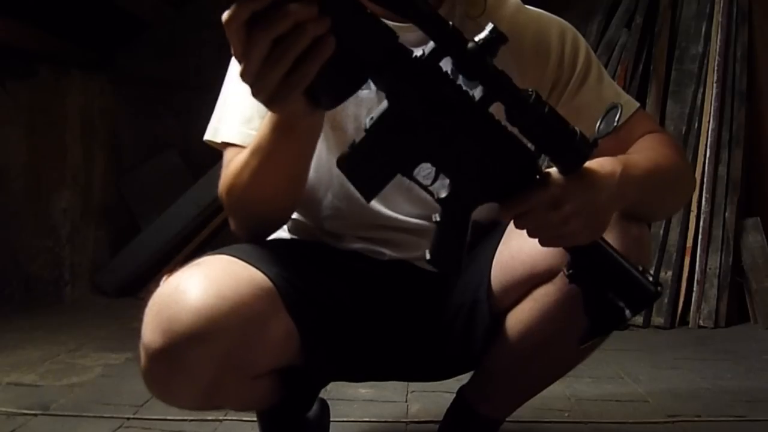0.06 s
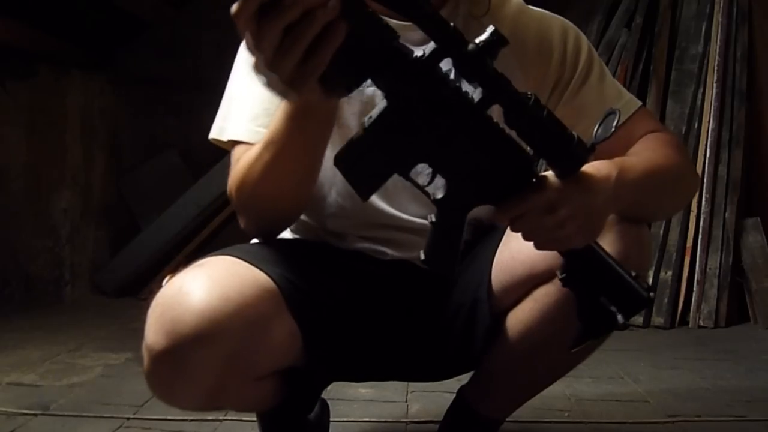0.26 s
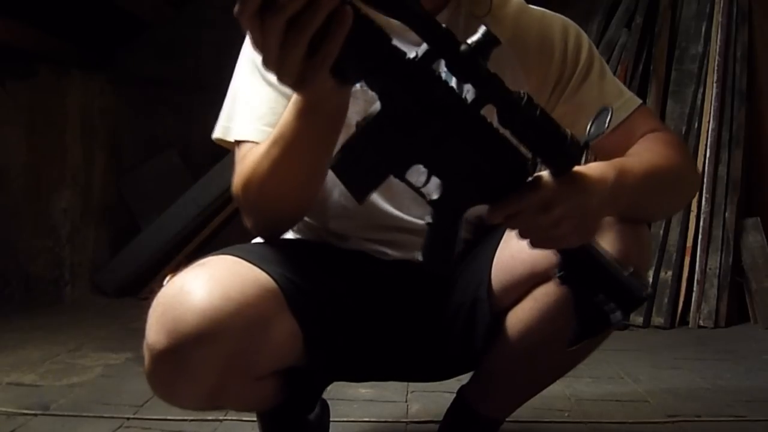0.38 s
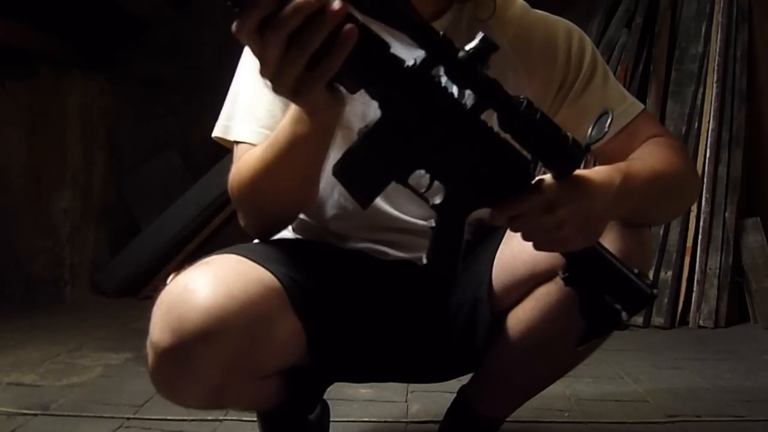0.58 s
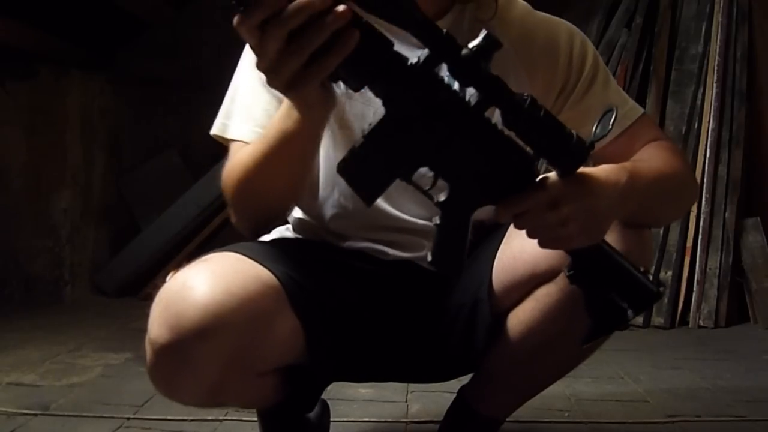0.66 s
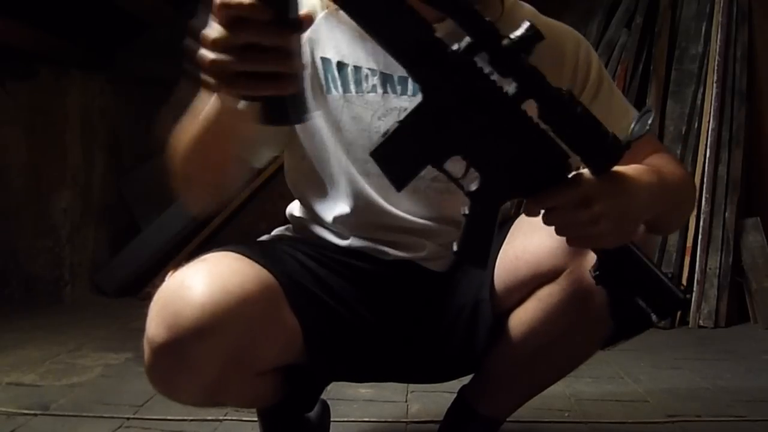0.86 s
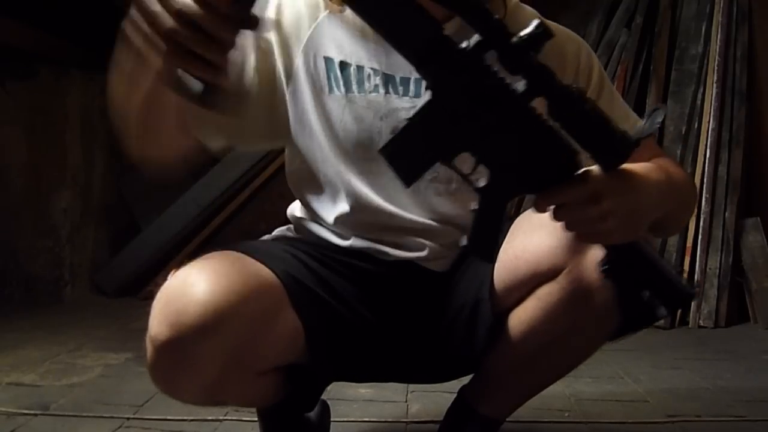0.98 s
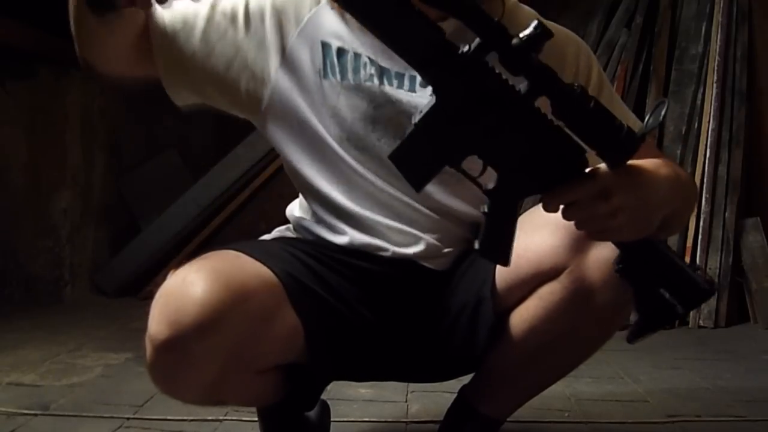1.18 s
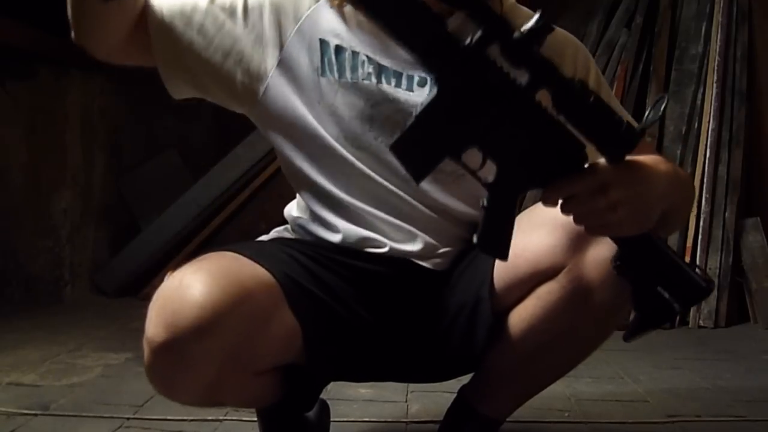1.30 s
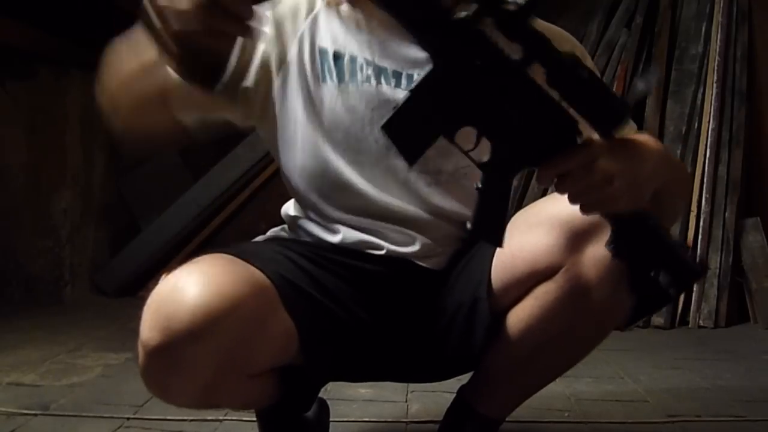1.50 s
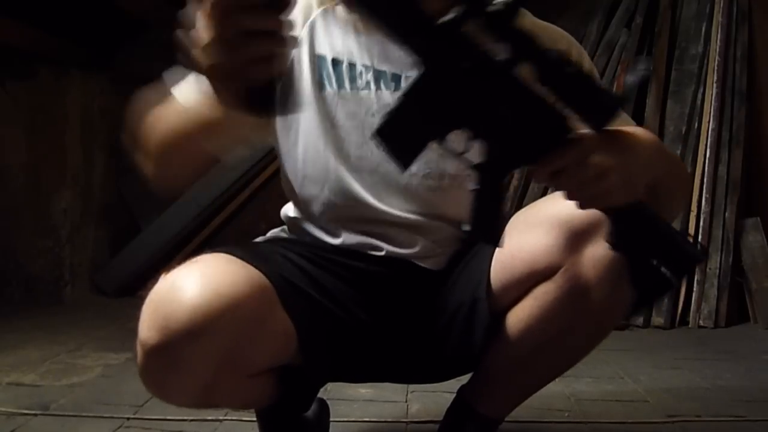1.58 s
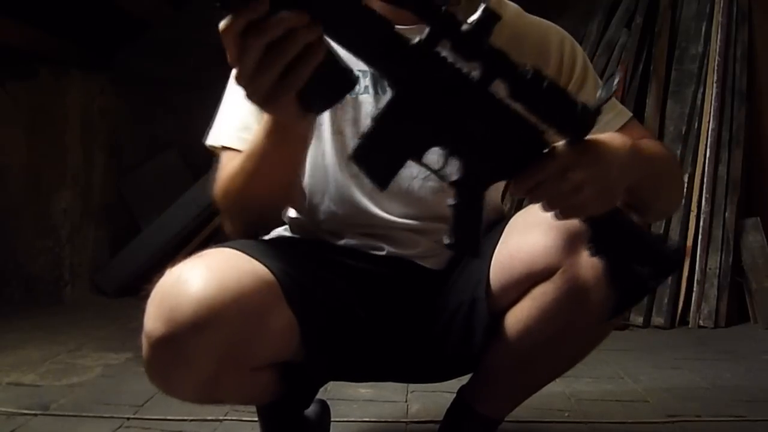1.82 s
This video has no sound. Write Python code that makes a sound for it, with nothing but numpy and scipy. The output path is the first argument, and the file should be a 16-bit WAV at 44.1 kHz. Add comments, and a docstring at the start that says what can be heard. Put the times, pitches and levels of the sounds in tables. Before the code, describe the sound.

An air rifle shot: a faint trigger click at 0.13 s, a brief scrape, then a loud ringing pop at 0.22 s. A rush of air lingers, thinning to hiss near 0.5 s. The pump lever clacks metallically at 0.64 s, echoing, with lighter clicks to 0.82 s. Quiet piston rubbing, sleeve rustle and tiny clicks continue to 1.85 s over room noise and low hum; dull mono microphone, gain ducking at the shot.

```python
"""Air rifle shot and pump stroke

An air rifle fires in a bare, echoing room: a click of the trigger, hammer scrape and thud, the valve's
pop through ringing barrel modes, then a rush and a thin hiss of air, all built from shaped noise and decaying sines.
The pump lever clacks open as a cluster of ringing contacts, then swings out and back with band-passed
clicks, a piston rub and a grainy rustle of sleeves, over room noise and a low sine hum.
The recorder's gain ducks at the shot and creeps back, so the rush of air seems to hold steady for a moment."""
import sys
import numpy as np
from scipy import signal
from scipy.fft import rfft, irfft
from scipy.io import wavfile

SR = 44100
rng = np.random.default_rng(int(sys.argv[2]) if len(sys.argv) > 2 else 0)


def dump_mix(stems):
    """Bounce the given channels to the path in sys.argv[1] as a 16-bit WAV at rate SR."""
    frames = np.atleast_2d(stems).T  # one column per channel
    limited = np.clip(frames, -1, 1)  # hard clip at full scale
    pcm = np.round(limited * 32767).astype(np.int16)
    wavfile.write(sys.argv[1], SR, pcm)


N = 81585  # length in samples
T = np.arange(N) / SR  # time in seconds

SHOT_S, SHOT_DB = .2222, 1
PUFF_DB, PUFF_T60_S = 1.5, 0.02
BARREL_DB, SHOT_ROOM_DB = -12, -12.5
BLAST_DB, BLAST_HZ = -28, 120
RUSH_DB, RUSH_T60_S, RUSH_BARREL_DB = -11, 0.57, -8.5
# Colour of the valve's pop: pitch_hz, gain_db
POP_COLOUR = [(100, -37), (350, -15), (550, 4.5), (950, -3), (1250, -12.5), (1800, -6.5), (2500, 4),
              (3000, 0.5), (3750, 3), (4600, -3), (6000, 1.5), (8000, -8)]
# Resonances of barrel and air chamber: pitch_hz, level_db, t60_s
BARREL_MODES = [(566.3, 12.5, 0.099), (640, -2, .05), (776, -8, 0.07), (1006, -27, .03),
                (1513, -19.5, 0.053), (1860, -4.5, 0.02), (2560, -15.5, 0.045), (2770, 10, 0.043),
                (3820, -5, .03), (6000, -9, 0.03)]
# Colour of the air rushing out: pitch_hz, gain_db
RUSH_COLOUR = [(100, -23), (380, -15), (540, 5), (900, 2), (1300, 0.5), (1800, 3), (2700, -1.5),
               (3400, -6.5), (4600, -10), (6000, -12), (8000, -17)]


def shot(echo):
    """The valve pops with a puff and a low push of air; the rest of the charge rushes out through the ringing barrel."""
    burst = pulses([(SHOT_S, SHOT_DB)])
    barrel = ring(BARREL_MODES)
    pop = undb(SHOT_DB) * blow(colour(burst, POP_COLOUR))
    puff = undb(PUFF_DB) * blow(colour(noise() * fade(PUFF_T60_S, SHOT_S), POP_COLOUR))
    barrel_ring = undb(BARREL_DB) * through(burst, barrel)
    push = undb(BLAST_DB) * blow(band(burst, BLAST_HZ, 1.2))
    direct = pop + puff + barrel_ring + push

    open_air = unit(colour(noise(), RUSH_COLOUR))
    barrel_air = undb(RUSH_BARREL_DB) * unit(through(noise(), barrel))
    rush = undb(RUSH_DB) * (open_air + barrel_air) * fade(RUSH_T60_S, SHOT_S)
    return direct + rush + undb(SHOT_ROOM_DB) * through(direct, echo)


SLIDE_S, SLIDE_DB, SLIDE_RISE_S = .221, -24, 0.045  # SLIDE_S is where the scrape ends
SPRING_S, SPRING_HZ, SPRING_DB = .2108, 5130, -30
HAMMER_S, HAMMER_DB = .2209, 0
# Colour of the sliding scrape: pitch_hz, gain_db
SLIDE_COLOUR = [(150, -38), (600, 5), (1800, 2.5), (3000, -2), (4500, -17.5), (8000, -14)]
# Colour of the hammer's thud: pitch_hz, gain_db
THUD_COLOUR = [(100, -14), (400, -19), (560, 5.5), (1000, 9), (1250, -13.5), (1800, 3.5), (2400, -6.5),
               (4000, -8.5), (8000, -37.5)]


def hammer():
    """The hammer scrapes forward while its spring sings in a narrow band, then thuds on the valve."""
    scrape = undb(SLIDE_DB) * unit(colour(noise(), SLIDE_COLOUR)) * swell(SLIDE_S, SLIDE_RISE_S)
    spring = noise() * fade(.03, SPRING_S)
    for _ in range(2):  # filtered twice for a purer pitch
        spring = band(spring, SPRING_HZ, 0.073)
    thud = undb(HAMMER_DB) * blow(colour(pulses([(HAMMER_S, 0)]), THUD_COLOUR))
    return scrape + undb(SPRING_DB) * blow(spring) - thud  # the thud has inverted polarity


# Thin hiss of escaping air: time_s, level_db
AIR_LEVEL = [(.25, -87), (.42, -41.5), (.50, -33.5), (.575, -31), (.61, -43), (.66, -39.5)]
# Colour of that hiss: pitch_hz, gain_db
AIR_COLOUR = [(1000, -47.5), (3000, -20), (4200, -6), (5500, -3), (6600, 0), (8000, -3.5)]


def air():
    """A thin hiss of air after the shot: coloured turbulence under a level curve."""
    return curve(AIR_LEVEL) * unit(colour(noise(), AIR_COLOUR))


LEVER_DB, CRACK_T60_S, CLACK_ROOM_DB = -5, 0.014, -6
LATCH_DB, LATCH_RISE_S = -30, 0.023
STOCK_S, STOCK_HZ, STOCK_DB, STOCK_SWELL_S = .648, 158, -37, 0.031
# Hard contacts as the lever snaps free and rattles: start_s, level_db
CLACKS = [(.6398, -23), (0.6417, -21.5), (.6462, -22), (.6492, -26.5), (0.6536, -30), (.664, -29)]
# Resonances of the lever: pitch_hz, level_db, t60_s
LEVER_MODES = [(513.3, -3.5, 0.21), (653, -4, .07), (825, -25, 0.093), (980, -2, 0.18), (1243, 0, 0.12),
               (1705, 10, 0.081), (1860, 1, 0.068), (2070, 6, 0.057), (2182, -7, 0.031), (2915, -11, .07),
               (3160, 2, 0.067), (3570, -17, .05), (4430, -2, 0.025)]
# Colour of the cracks and the latch scrape: pitch_hz, gain_db
CRACK_COLOUR = [(100, -29.5), (400, -3.5), (600, 3), (1400, 4.5), (2000, 5), (4000, -6), (5000, -9),
                (8000, -15.5)]


def lever(echo):
    """The latch scrapes, a cluster of hard contacts rings the lever and the stock booms softly after it."""
    cracks = sum(undb(level_db) * blow(colour(noise() * fade(CRACK_T60_S, start_s), CRACK_COLOUR))
                 for start_s, level_db in CLACKS)
    ringing = undb(LEVER_DB) * through(pulses(CLACKS), ring(LEVER_MODES))
    first_clack_s = CLACKS[0][0]
    latch = undb(LATCH_DB) * unit(colour(noise(), CRACK_COLOUR)) * swell(first_clack_s, LATCH_RISE_S)
    direct = cracks + ringing + latch

    age = np.maximum(T - STOCK_S, 0) / STOCK_SWELL_S
    bloom = (age * np.exp(1 - age)) ** 2  # peaks at 1 when age is 1
    boom = undb(STOCK_DB) * np.sqrt(2) * bloom * np.sin(2 * np.pi * STOCK_HZ * T)
    return direct + boom + undb(CLACK_ROOM_DB) * through(direct, echo)


CLICK_ROOM_DB = -11
# Soft clicks of trigger and linkage: start_s, level_db, centre_hz, width_octaves, t60_s
CLICKS = [(0.1335, -42, 4300, 1.2, 0.072), (0.134, -46.5, 2190, 0.24, 0.11), (0.683, -26, 790, 0.61, .025),
          (.763, -44.5, 5850, 1.1, 0.07), (0.8172, -36, 2990, .2, 0.14), (0.815, -38, 800, 1.1, 0.049),
          (.824, -42, 4500, 1.5, 0.075), (1.108, -48, 1700, 0.62, 0.023), (1.393, -45, 680, 1.5, 0.06),
          (1.4319, -45.5, 1020, 0.47, 0.037), (1.431, -50, 2800, 0.17, 0.037),
          (1.497, -42, 1070, 0.06, .025), (1.499, -44.5, 1600, 0.064, .1), (1.511, -52, 720, 1.3, 0.017),
          (1.581, -53, 900, 1.0, 0.054), (1.837, -49.5, 2230, 0.36, .04)]


def clicks(echo):
    """Light contacts, each a short noise burst in one resonance."""
    direct = np.zeros(N)
    for start_s, level_db, centre_hz, width_octaves, t60_s in CLICKS:
        burst = noise() * fade(t60_s, start_s)
        direct += undb(level_db) * blow(band(burst, centre_hz, width_octaves))
    return direct + undb(CLICK_ROOM_DB) * through(direct, echo)


PISTON_RING_HZ, PISTON_RING_DB = 3020, -14.5
# Sleeves rustling as the arm swings: time_s, level_db
SLEEVE_LEVEL = [(0, -44.5), (.6, -48.5), (.75, -41.5), (.93, -47), (1.05, -42.5), (1.12, -40),
                (1.18, -48.5), (1.24, -45), (1.3, -47.5), (1.55, -46.5), (1.85, -50)]
# Colour of the cloth: pitch_hz, gain_db
SLEEVE_COLOUR = [(80, 1.5), (210, 4), (400, 0.5), (900, -5.5), (1600, -15.5), (4000, -23), (8000, -41.5)]
# Piston rubbing in its tube: time_s, level_db
PISTON_LEVEL = [(.8, -52.5), (.88, -47), (.95, -50), (.99, -47), (1.03, -52), (1.12, -48), (1.26, -64),
                (1.34, -53), (1.40, -54), (1.53, -50.5), (1.65, -65), (1.85, -57)]
# Colour of the rub: pitch_hz, gain_db
PISTON_COLOUR = [(300, -7.5), (1000, 8.5), (2200, 3), (3100, 0.5), (4000, -7), (5000, -6), (8000, -15)]


def stroke():
    """Cloth rustles in grains of friction; the piston rubs and faintly rings its tube."""
    rub = grainy(220)
    tube_ring = undb(PISTON_RING_DB) * unit(band(rub, PISTON_RING_HZ, 0.021))
    piston = curve(PISTON_LEVEL) * (unit(colour(rub, PISTON_COLOUR)) + tube_ring)
    sleeves = curve(SLEEVE_LEVEL) * unit(colour(grainy(98), SLEEVE_COLOUR))
    return sleeves + piston


FLOOR_DB, HUM_HZ = -49.5, 53.6
# Colour of the steady room noise: pitch_hz, gain_db
FLOOR_COLOUR = [(25, -3), (60, 5.5), (100, -9), (200, -8), (350, -10.5), (700, -8.5), (1000, -9),
                (1600, -13.5), (2500, -18.5), (4000, -21), (8000, -23)]
# Wavering low hum: time_s, level_db
HUM_LEVEL = [(0, -51), (.22, -51), (.45, -57), (.75, -49), (.8, -56), (.885, -46), (.98, -60), (1.13, -53),
             (1.22, -65), (1.33, -55), (1.54, -55), (1.7, -45), (1.85, -46)]


def background():
    """Steady room noise and a low sine hum of wavering level."""
    floor = undb(FLOOR_DB) * unit(colour(noise(), FLOOR_COLOUR))
    hum = curve(HUM_LEVEL) * np.sqrt(2) * np.sin(2 * np.pi * HUM_HZ * T)
    return floor + hum


ROOM_BUILD_S = 0.0016
# Decay of the bare room: pitch_hz, t60_s
ROOM_DECAY = [(150, 0.67), (600, 0.56), (2000, 0.42), (4000, 0.48), (8000, 0.44)]


def room():
    """Diffuse echo of unit energy: noise in overlapping bands, the bass lasting longest."""
    pitch_hz, t60_s = np.array(ROOM_DECAY).T
    spectrum = rfft(noise())
    log_f = np.log(np.maximum(np.fft.rfftfreq(N, 1 / SR), 1))
    tail = np.zeros(N)
    for share, t60 in zip(np.eye(len(pitch_hz)), t60_s):
        weight = np.interp(log_f, np.log(pitch_hz), share)  # triangle around one band
        tail += irfft(spectrum * weight, N) * fade(t60)
    tail = tail * (1 - np.exp(-T / ROOM_BUILD_S))
    return tail / np.sqrt(np.sum(tail ** 2))


def undb(db):
    """Decibels to gain."""
    return 10 ** (np.asarray(db) / 20)


def unit(x):
    """Scale to rms 1."""
    return x / np.sqrt(np.mean(x ** 2))


def blow(x):
    """Scale a short sound to the energy of 10 ms at rms 1."""
    return x * np.sqrt(SR / 10 / 10 / np.sum(x ** 2))


def noise():
    """White noise."""
    return rng.standard_normal(N)


GRAIN_DB = 1  # typical size of a grain's level change


def grainy(rate_hz):
    """Noise whose level wanders between small random grains."""
    steps = np.arange(0, N, SR / rate_hz)
    grains = np.interp(np.arange(N), steps, noise()[:len(steps)])
    return noise() * undb(GRAIN_DB * grains)


def fade(t60, start=0):
    """Exponential decay by 60 dB in t60 seconds from a start time."""
    return (T >= start) * np.exp(-np.log(1000) * np.maximum(T - start, 0) / t60)


def swell(end_s, rise_s):
    """A level that grows by 30 dB in its rise time and stops at the end."""
    return (T < end_s) * np.exp(np.log(1000) / 2 * np.minimum(T - end_s, 0) / rise_s)


def curve(rows):
    """Gain along (time_s, level_db) points, silent outside them; a last point near the end is held."""
    time_s, level_db = np.array(rows).T
    after_db = level_db[-1] if time_s[-1] > T[-1] - .1 else -120
    return undb(np.interp(T, time_s, level_db, left=-120, right=after_db))


def through(x, response):
    """Convolve a sound with a response."""
    return signal.fftconvolve(x, response)[:N]


def colour(x, points):
    """Minimum-phase filter that follows (pitch_hz, gain_db) points."""
    pitch_hz, gain_db = np.array(points).T
    size = 8192
    f = np.maximum(np.fft.rfftfreq(size, 1 / SR), 1)
    gain = undb(np.interp(np.log(f), np.log(pitch_hz), gain_db))
    # folding the cepstrum forward in time makes the filter causal
    cepstrum = irfft(np.log(gain))
    cepstrum[1:size // 2] *= 2
    cepstrum[size // 2 + 1:] = 0
    return through(x, irfft(np.exp(rfft(cepstrum)))[:size // 2])


def band(x, hz, octaves):
    """One resonance of a given width."""
    half = 2 ** (octaves / 2)
    edges = np.clip([hz / half, hz * half], 10, SR * .45)
    return signal.sosfilt(signal.butter(1, edges, "band", fs=SR, output="sos"), x)


def pulses(rows):
    """One impulse for each (start_s, level_db)."""
    out = np.zeros(N)
    for start_s, level_db in rows:
        out[int(start_s * SR)] += undb(level_db)
    return out


def ring(modes):
    """Decaying sine modes of a struck part."""
    return blow(sum(undb(level_db) * np.sin(2 * np.pi * pitch_hz * T) * fade(t60_s)
                    for pitch_hz, level_db, t60_s in modes))


def scene():
    """Everything is heard from the centre, the shot, clacks and clicks sharing one room."""
    echo = room()
    mid = shot(echo) + hammer() + air() + lever(echo) + clicks(echo) + stroke() + background()
    return np.array([mid, mid])


DUCK_DB, DUCK_ATTACK_S, RECOVER_DB_PER_S = -8.5, 0.00048, 106.5  # DUCK_DB is the threshold
THUMP_SIZE, THUMP_HZ = .0014, 12  # thump amplitude per dB of ducking, before its low-pass
CEILING, TOP_HZ, OFFSET = 1.0, 15600, .0148  # OFFSET is a constant added to the wave
# Dull response of the microphone: pitch_hz, gain_db
MIC_COLOUR = [(7300, -3), (8200, -12), (8700, -27), (9200, -41.5), (12000, -36.5), (16000, -66)]


def record(dry):
    """A dull mono microphone; the gain ducks fast with a faint deep thump and recovers slowly; peaks are rounded."""
    x = colour(dry.mean(axis=0), MIC_COLOUR)
    keep = np.exp(-1 / (DUCK_ATTACK_S * SR))
    loudness = signal.lfilter([1 - keep], [1, -keep], np.abs(x))
    over_db = 20 * np.log10(np.maximum(loudness / undb(DUCK_DB), 1))
    # hold the deepest duck so far and let it recover at a steady rate
    recovered_db = RECOVER_DB_PER_S * T
    duck_db = np.maximum.accumulate(over_db + recovered_db) - recovered_db
    thump = THUMP_SIZE * signal.sosfilt(signal.butter(1, THUMP_HZ, fs=SR, output="sos"), duck_db)
    x = x * undb(-duck_db) + thump
    x = x / (1 + (x / CEILING) ** 4) ** .25  # soft ceiling
    x = np.convolve(x, signal.firwin(91, TOP_HZ, fs=SR), "same") + OFFSET
    return np.array([x, x])


dry = scene()
out = record(dry)
dump_mix(out)
```